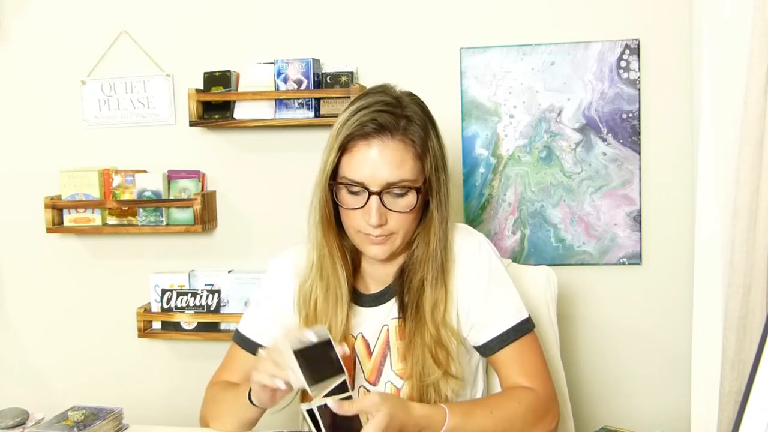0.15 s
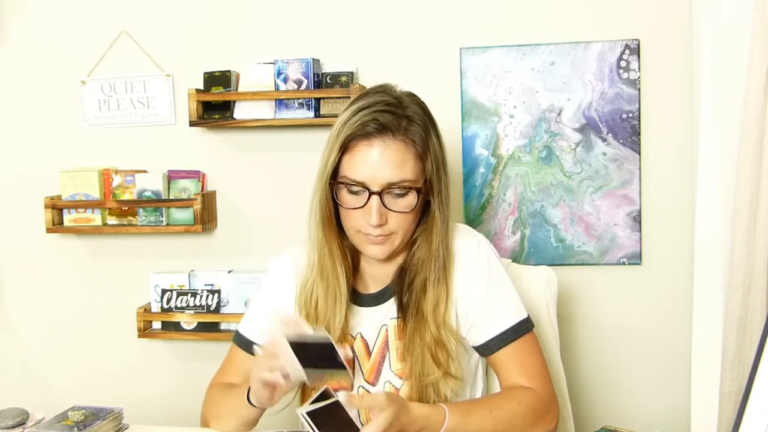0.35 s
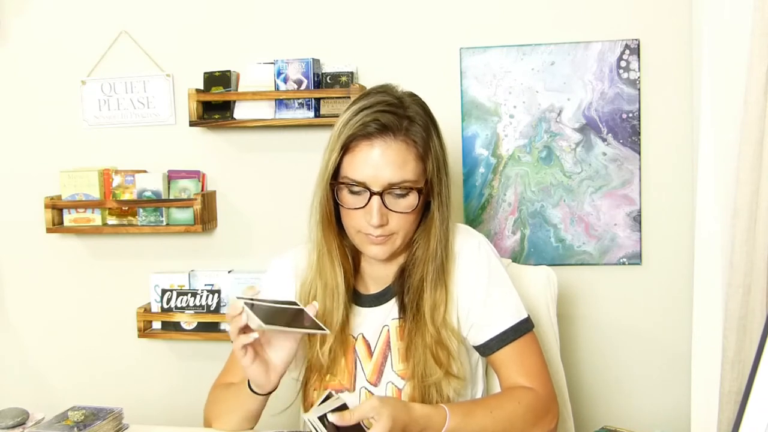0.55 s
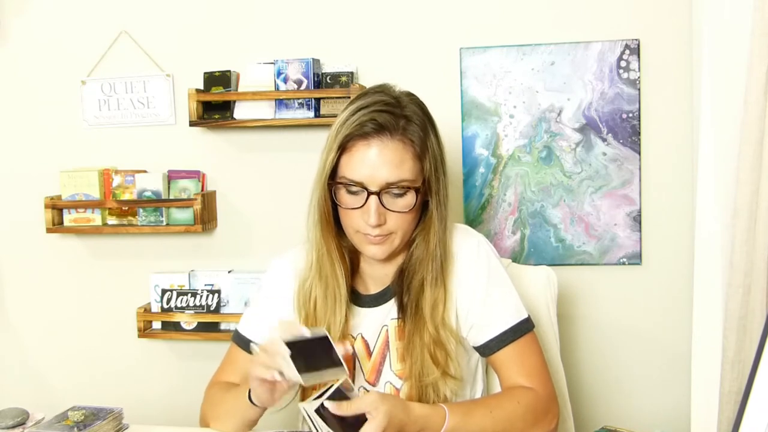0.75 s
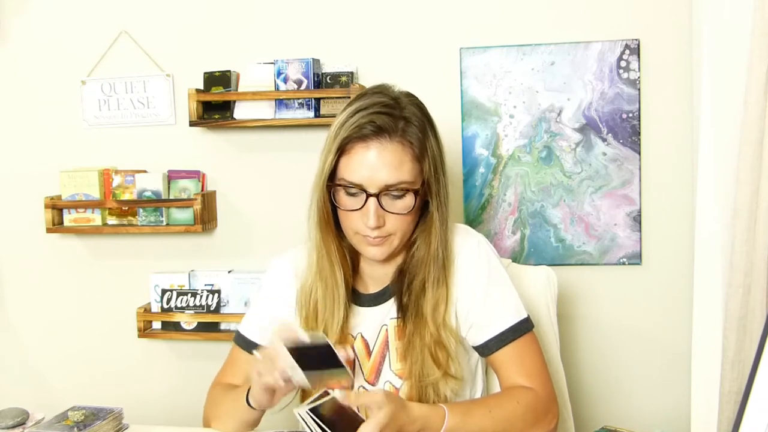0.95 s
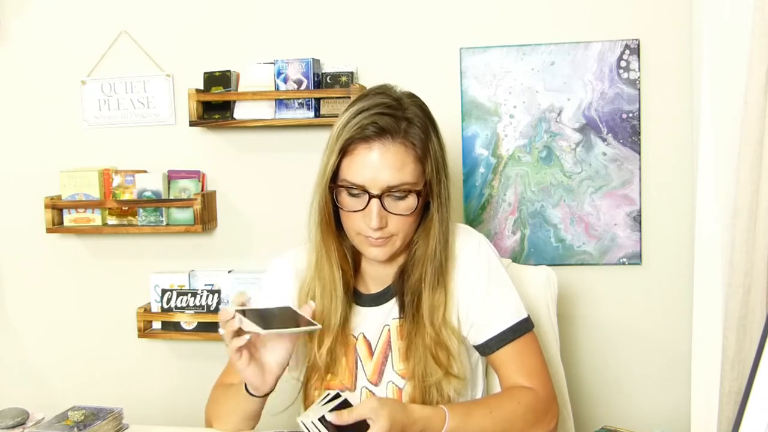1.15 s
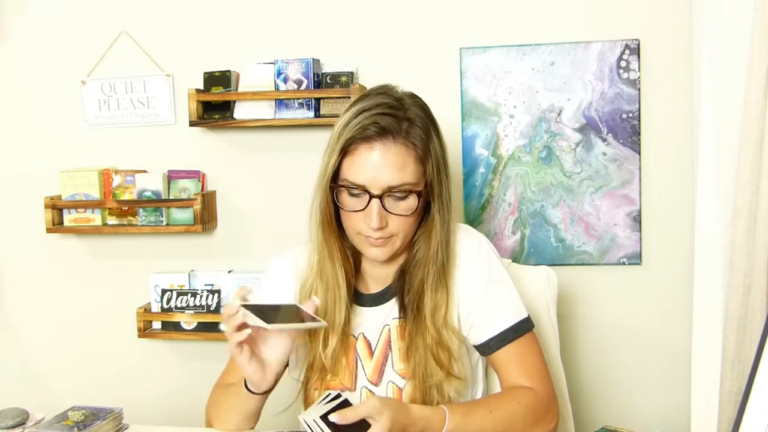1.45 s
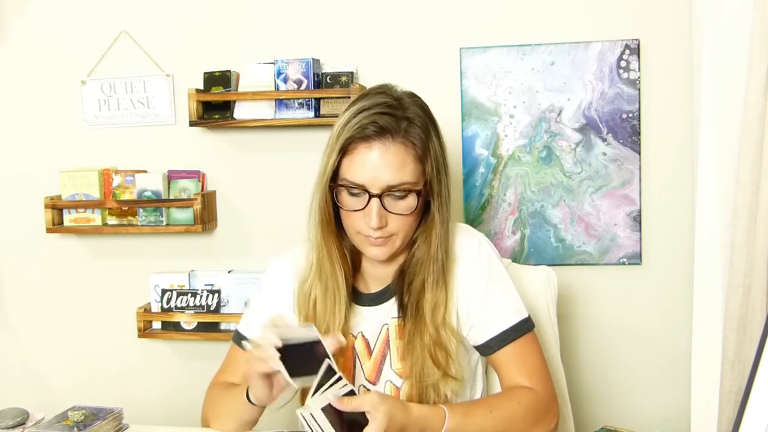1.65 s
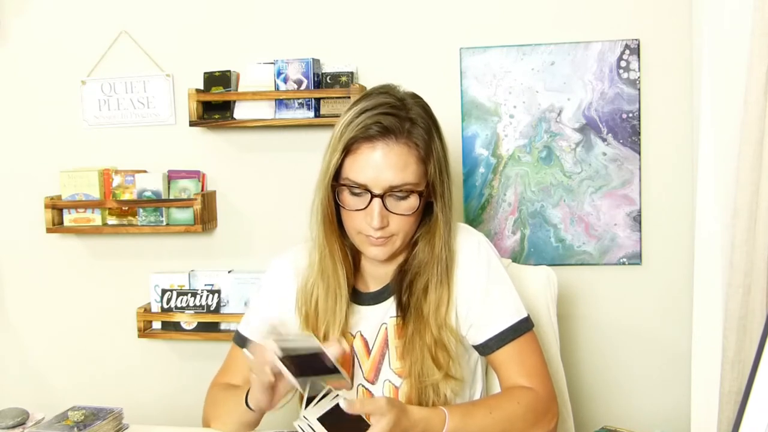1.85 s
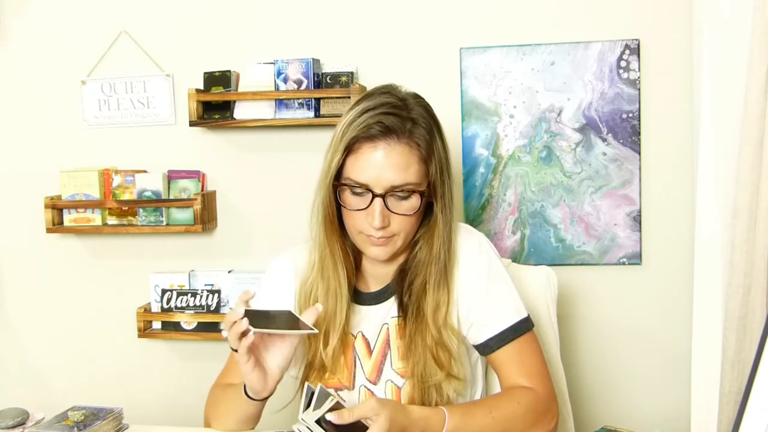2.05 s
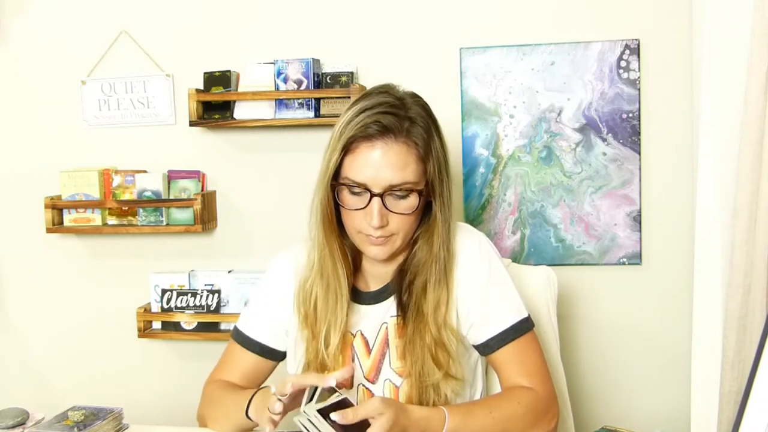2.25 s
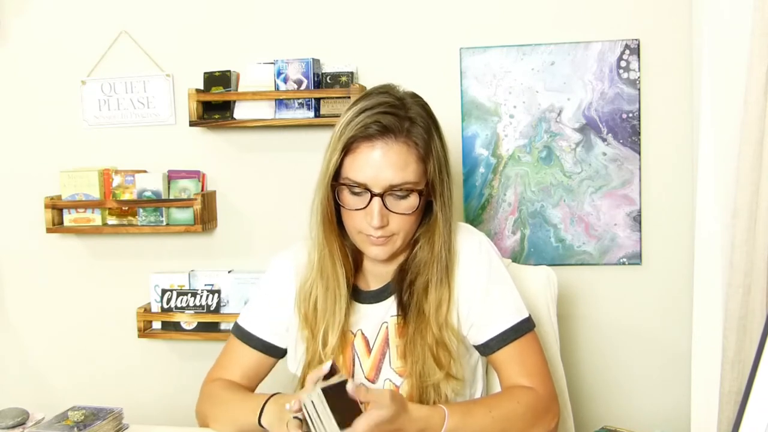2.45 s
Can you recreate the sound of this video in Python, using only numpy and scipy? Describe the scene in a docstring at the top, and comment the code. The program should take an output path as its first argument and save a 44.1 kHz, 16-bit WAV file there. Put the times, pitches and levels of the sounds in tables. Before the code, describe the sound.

A deck of cards is shuffled overhand, about three strokes a second. Each stroke brings a brief scratchy rub and a crisp slap, heard from nearby in a small, lively room with a faint steady hiss.

```python
"""In a small, lively room, a deck of cards is shuffled overhand, about three strokes a second.
In each stroke a packet of cards meets the deck; they rub past each other with a scratchy hiss
and drop into the other hand with a slap. Now and then the deck settles with a soft, low bump.
Near surfaces echo each rub and slap, the room rings on, and a faint steady hiss lies underneath."""
import sys
import numpy as np
from scipy import signal
from scipy.fft import rfft, irfft, next_fast_len
from scipy.io import wavfile

SR = 44100
rng = np.random.default_rng(int(sys.argv[2]) if len(sys.argv) > 2 else 0)


def persist_wave(psi):
    """Save psi, clipped to +-1, as 16-bit WAV."""
    counts = np.round(np.clip(psi, -1, 1) * 32767).astype(np.int16)
    wavfile.write(sys.argv[1], SR, np.atleast_2d(counts).T)


N = 114660

# cards rubbing past each other: start_s, length_s, level_db, top_treble_db
RUBS = [(0, 0.034, -38, -3), (0.204, 0.0089, -40, -5), (0.2173, 0.06, -32.5, 1.5), (0.522, 0.035, -35, -1),
        (0.565, 0.012, -35, -4), (0.824, 0.046, -22.5, -8.5), (1.049, 0.063, -52.5, 5.5),
        (1.123, 0.044, -31, -1), (1.174, 0.0088, -33, -10), (1.692, 0.066, -41.5, -0.5),
        (1.723, 0.057, -43.5, 7), (1.767, 0.046, -65, 4), (2.005, .03, -42.5, 7), (2.037, 0.026, -35.5, 0),
        (2.098, .035, -44, -3), (2.323, 0.027, -33.5, -3), (2.483, 0.021, -49, 3.5),
        (2.519, 0.032, -47.5, 0), (2.577, .03, -47, 4)]
# how strong each pitch is in a rub: pitch_hz, level_db
RUB_COLOUR = [(60, -36.5), (200, -21.5), (450, 2.5), (1000, 1.5), (1900, 5), (2800, 2), (3500, 2.5),
              (4100, 6), (4600, 2), (5400, 0.5), (6800, -10.5), (8300, -11.5), (10500, -3.5), (13500, -10),
              (15500, -20)]
# how strong each pitch is in the steady hiss: pitch_hz, level_db
HISS_COLOUR = [(15, -37), (25, -13), (289, -3.5), (457, 1.5), (666, -0.5), (804, 2), (945, -8), (1080, -2),
               (1380, -6.5), (1710, -9), (2230, -1), (2850, -12.5), (4620, -10.5), (8350, -26.5),
               (10600, -18), (13900, -15.5), (15500, -21.5)]
# packets landing: start_s, level_db, fade_s, bass_db, hollow_db, treble_db, top_treble_db,
# lower_ring_hz, upper_ring_hz (every fade here is the time to drop by 60 dB)
SLAPS = [(.0032, -29.5, 0.0046, 6, -7, 5, 6.5, 1800, 4860), (0.117, -40, .008, -19, -6, 1, -1, 3870, 5170),
         (0.2276, -18, 0.038, 4, -2, 2, -12, 1100, 1510),
         (0.2786, -21, 0.012, -4.5, -16, -5.5, -19, 1020, 1840),
         (0.4907, -29.5, 0.037, 8.5, -1, -7.5, -7, 850, 1735),
         (.4985, -30.5, 0.041, -2, 0, 6, 5, 810, 1750), (0.5354, -26, 0.014, 0.5, -12, -6, 4, 1920, 3860),
         (.5812, -19.5, 0.014, 6, -1.5, 2, -1, 930, 1590), (0.7946, -25.5, 0.075, -3, 4, 1, -3, 870, 1510),
         (0.8217, -13, .016, -9, -13, 1.5, 6.5, 1730, 5200),
         (0.8309, -21.5, 0.0049, -10.5, -1, -10, 6, 1720, 2920),
         (0.8562, -27, .03, -8, 1, -13, 5, 840, 1470), (.869, -19, 0.053, -2.5, 10, -28, -23, 2020, 4100),
         (1.1069, -22, 0.088, -0.5, -6, 5, -2, 894, 2200),
         (1.1152, -19, 0.022, -8, 0, -1.5, 2.5, 2650, 3950),
         (1.184, -24, 0.021, 0.5, 2, 0.5, -4, 840, 2070),
         (1.3851, -29, 0.028, -1.5, 4.5, 1.5, -0.5, 845, 1640),
         (1.417, -37.5, 0.026, -2, -10, -11, -16, 840, 1750),
         (1.4531, -35.5, .009, -19, -6, 6, 14, 4080, 5270),
         (1.7015, -37.5, 0.004, 9.5, 0, 6, -9, 2300, 4830), (1.744, -38.5, .01, -2, -3, 20, 23, 2400, 4370),
         (1.8075, -24, 0.0066, 5.5, 1, -5, 3, 485, 2210),
         (2.0092, -23.5, 0.027, -8, 6.5, 3.5, -3, 1590, 2150),
         (2.059, -31.5, .015, 15, -4, 8, 14, 4000, 4470),
         (2.0849, -18.5, 0.013, -1.5, -22, 2.5, 0.5, 1496, 3230),
         (2.3112, -23.5, 0.021, 4, 0.5, 3, -1.5, 2160, 3930),
         (2.537, -41.5, 0.027, 0, 4, -1, -8, 2270, 4050)]
# how strong each pitch is in a slap: pitch_hz, level_db
SLAP_COLOUR = [(60, -32.5), (170, -22), (300, -10), (480, -2.5), (900, -1), (1250, -3), (1750, 0.5),
               (2700, -1.5), (3500, -4.5), (4100, 1), (4550, -6.5), (5300, -6), (6800, -17), (8300, -22),
               (10500, -12.5), (13500, -19), (15500, -29.5)]
# the deck bumping in the cupped hand: start_s, pitch_hz, level_db
BUMPS = [(.968, 385, -34), (1.69, 480, -37), (1.762, 480, -40), (1.808, 270, -34), (1.836, 325, -37)]
# echoes off near surfaces: delay_s, level_db
ECHOES = [(.0021, -17.5), (.0041, -15.5), (.0062, -7.5), (.0091, -7.5), (0.0116, -17), (0.0146, -6)]
# how long the room rings: pitch_hz, fade_s
ROOM_FADE = [(150, 0.24), (500, 0.29), (1500, 0.29), (4000, 0.33), (10000, 0.25), (15000, 0.18)]
# how strong each pitch is in the room's ring: pitch_hz, level_db
ROOM_COLOUR = [(150, 9), (500, 0), (2000, -0.5), (4200, -3.5), (6500, -0.5), (11000, -2)]


def gain(db):
    """Turn decibels into a number to multiply by."""
    return 10 ** (np.asarray(db) / 20)


def normalised(x):
    """Scale x to an average strength (rms) of 1."""
    return x / np.sqrt(np.mean(x ** 2) + 1e-20)


def curve_at(points, hz):
    """Read between the rows of a (pitch_hz, value) table, on a log pitch scale."""
    pitches, values = np.transpose(points)
    return np.interp(np.log(hz + 1), np.log(pitches + 1), values)


def coloured(x, db_at):
    """Make each pitch in x louder or softer by db_at(hz) decibels."""
    size = 2 * next_fast_len(x.shape[-1])
    hz = np.fft.rfftfreq(size, 1 / SR)
    cepstrum = irfft(np.log(gain(db_at(hz)) + 1e-6))
    # fold it so that the filter never rings before the sound arrives
    cepstrum[1:size // 2] *= 2
    cepstrum[size // 2 + 1:] = 0
    return irfft(rfft(x, size) * np.exp(rfft(cepstrum)))[..., :x.shape[-1]]


def tone_db(hz, bass_db=0, treble_db=0, top_db=0):
    """Tone controls for one rub or slap; the middle pitches stay as they are."""
    return curve_at([(150, 0), (300, bass_db), (500, bass_db), (800, 0), (2200, 0),
                     (3400, treble_db), (6000, treble_db), (9500, top_db)], hz)


def in_room(rays, ring_db=-2, build_s=0.029, echo_cutoff_hz=9300):
    """Each ray (sound sent one way) rings the room; the first also arrives directly and as echoes."""
    hz, t, noise = signal.stft(rng.standard_normal((len(rays), SR // 2)), SR, nperseg=256)
    fade = gain(-60 * t / curve_at(ROOM_FADE, hz)[:, None]) * (1 - np.exp(-t / build_s))
    colour = gain(curve_at(ROOM_COLOUR, hz))[:, None]
    responses = signal.istft(noise * fade * colour, SR, nperseg=256)[1]
    energy = np.sum(fade[hz < 5000] ** 2, axis=1).mean() * SR * t[1] * len(rays)
    responses *= gain(ring_db) / np.sqrt(energy)
    echoes = np.zeros(responses.shape[1])
    for delay_s, level_db in ECHOES:
        echoes[round(delay_s * SR)] += gain(level_db)
    responses[0] += signal.lfilter(*signal.butter(1, echo_cutoff_hz, fs=SR), echoes)
    responses[0, 0] += 1  # the direct sound
    return signal.fftconvolve(rays, responses, axes=1).sum(axis=0)


def add(track, start_s, x):
    """Mix x into the track from start_s on."""
    i = max(round(start_s * SR), 0)
    track[i:i + len(x)] += x[:max(N - i, 0)]


def card_rubs(ticks_per_s=980, tick_spread_db=4.5, hiss_over_ticks_db=1, rise_s=0.00067, fall_s=0.0088):
    """Card faces rub with a hiss while their edges catch in tiny random ticks."""
    track, t = np.zeros(N), np.arange(SR // 6) / SR
    for start_s, length_s, level_db, top_db in RUBS:
        ticks = (rng.random(len(t)) < ticks_per_s / SR) * rng.choice([-1, 1], len(t))
        ticks = ticks * gain(tick_spread_db * rng.standard_normal(len(t)))
        friction = normalised(ticks) + gain(hiss_over_ticks_db) * rng.standard_normal(len(t))
        rub = coloured(friction, lambda hz: curve_at(RUB_COLOUR, hz) + tone_db(hz, top_db=top_db))
        stroke = (1 - np.exp(-t / rise_s)) * np.exp(-np.maximum(t - length_s, 0) / fall_s)
        add(track, start_s, in_room(gain(level_db) * stroke * normalised(rub)[None]))
    return track


def steady_hiss(level_db=-47.5):
    """The room and the microphone make a faint, even noise."""
    hiss = coloured(rng.standard_normal(N), lambda hz: curve_at(HISS_COLOUR, hz))
    return gain(level_db) * normalised(hiss)


def packet_ring_db(hz, pitches_hz, hollow_db, peak_db=9.5, width_hz=111,
                   hollow_hz=2620, hollow_width_hz=230):
    """A packet rings at pitches set by its thickness and the grip; one band is hollowed or lifted."""
    peaks = sum(1 / (1 + ((hz - pitch_hz) / width_hz) ** 2) for pitch_hz in pitches_hz)
    return peak_db * peaks + hollow_db / (1 + ((hz - hollow_hz) / hollow_width_hz) ** 2)


def card_slaps(directions=3, rise_s=0.0009, away_ring_share=0.6):
    """Cards land almost together: a dying clatter rings the packet, differently in each direction."""
    track, t = np.zeros(N), np.arange(SR // 10) / SR
    for start_s, level_db, fade_s, bass_db, hollow_db, treble_db, top_db, *rings_hz in SLAPS:
        noise = rng.choice([-1, 1], (directions, len(t)))
        clatter = noise * gain(-60 * t / fade_s) * (1 - np.exp(-t / rise_s))
        body_db = lambda hz: curve_at(SLAP_COLOUR, hz) + tone_db(hz, bass_db, treble_db, top_db)
        ring_db = lambda hz: packet_ring_db(hz, rings_hz, hollow_db)
        toward_mic = coloured(clatter[0], lambda hz: body_db(hz) + ring_db(hz))
        away = coloured(clatter[1:], lambda hz: body_db(hz) + away_ring_share * ring_db(hz))
        rays = np.vstack([toward_mic, away])
        # give each ray the energy of 6 ms of sound at strength 1
        rays /= np.sqrt(np.sum(rays ** 2, axis=1, keepdims=True) / (0.006 * SR))
        add(track, start_s, in_room(gain(level_db) * rays))
    return track


def deck_bumps(rise_s=0.005, fade_s=0.1):
    """The deck settles in the hand with a low, hollow knock."""
    track, t = np.zeros(N), np.arange(SR // 5) / SR
    for start_s, pitch_hz, level_db in BUMPS:
        loudness = gain(level_db - 60 * t / fade_s) * (1 - np.exp(-t / rise_s))
        add(track, start_s, loudness * np.sin(2 * np.pi * pitch_hz * t))
    return track


def scene():
    """The shuffle over the quiet room, in one channel."""
    return (card_slaps() + card_rubs() + deck_bumps() + steady_hiss())[None]


def record(dry):
    """The microphone has a narrow dip in the treble and cuts off the very highest pitches."""
    dip_hz, width_hz, depth, cutoff_hz = 8250, 800, 0.93, 15750
    size = next_fast_len(N + SR // 2)
    hz = np.fft.rfftfreq(size, 1 / SR)
    dip = 1j * hz * width_hz / (dip_hz ** 2 - hz ** 2 + 1j * hz * width_hz)
    response = (1 - depth * dip) * (hz < cutoff_hz)
    return irfft(rfft(dry, size) * response, size)[:, :N]


dry = scene()
out = record(dry)
persist_wave(out)
```